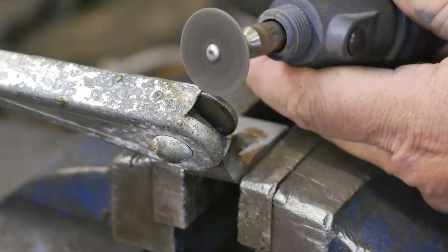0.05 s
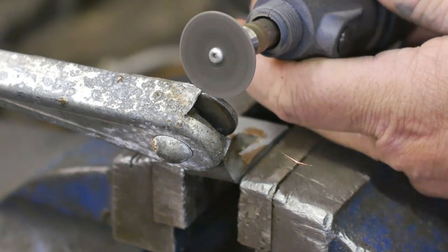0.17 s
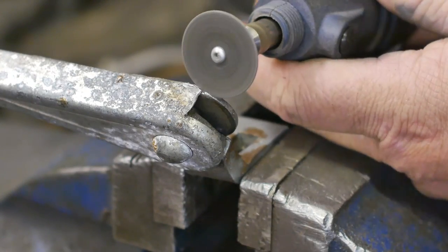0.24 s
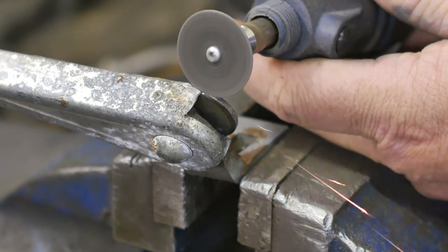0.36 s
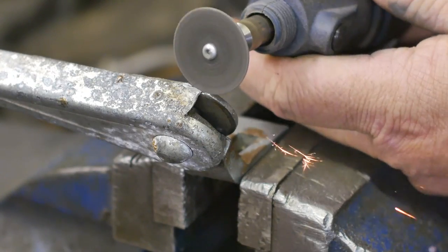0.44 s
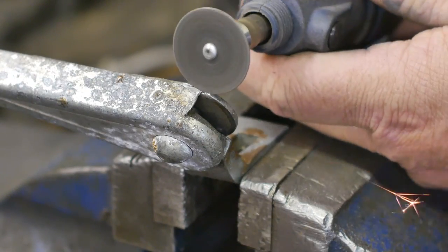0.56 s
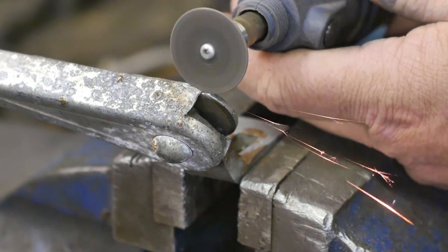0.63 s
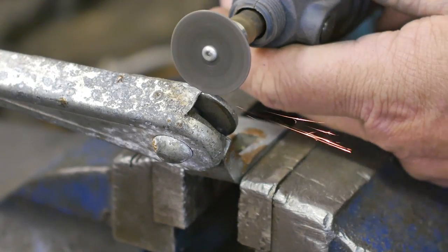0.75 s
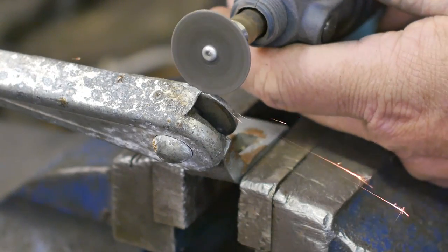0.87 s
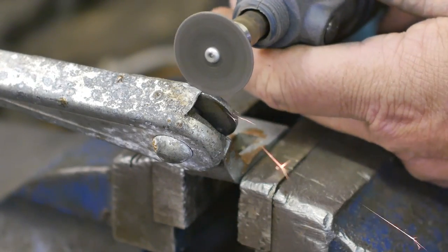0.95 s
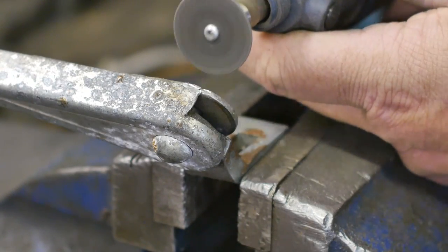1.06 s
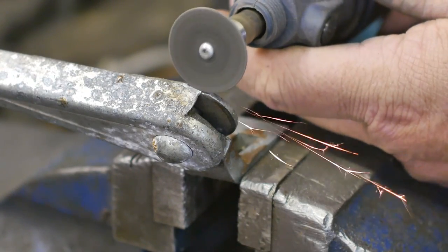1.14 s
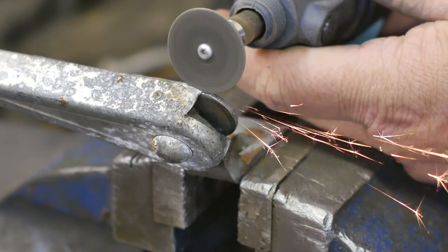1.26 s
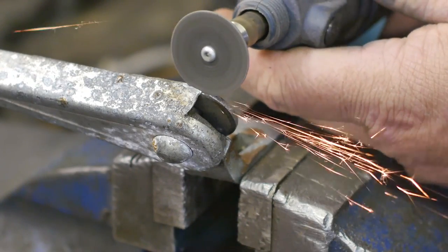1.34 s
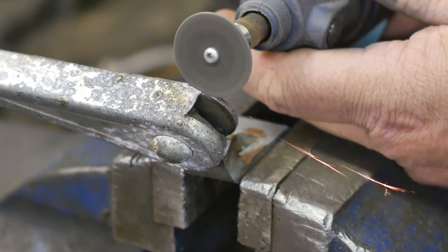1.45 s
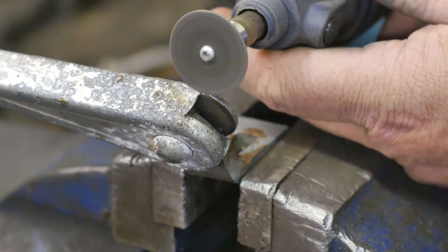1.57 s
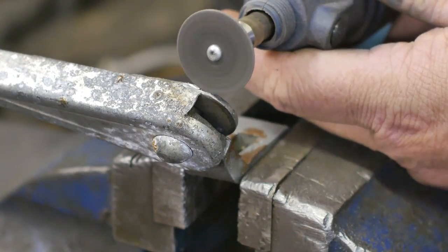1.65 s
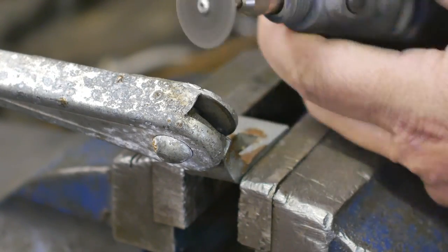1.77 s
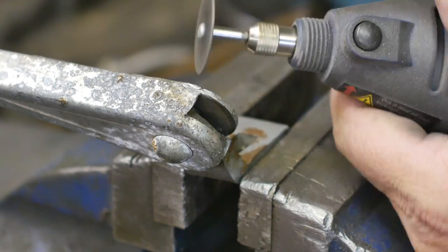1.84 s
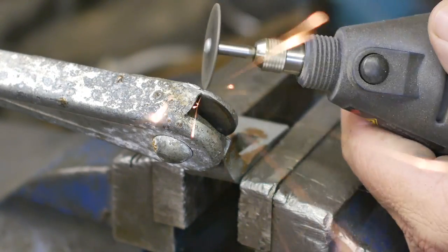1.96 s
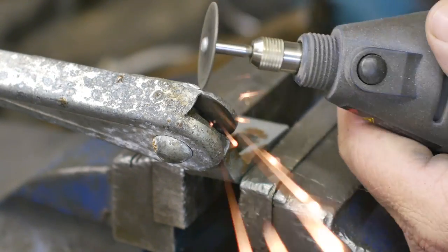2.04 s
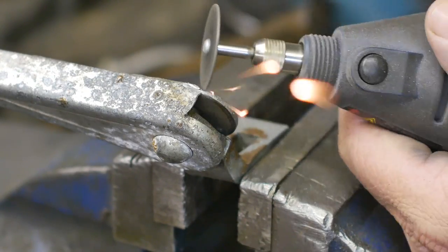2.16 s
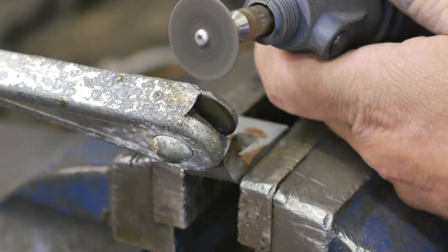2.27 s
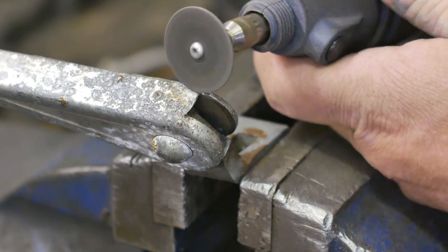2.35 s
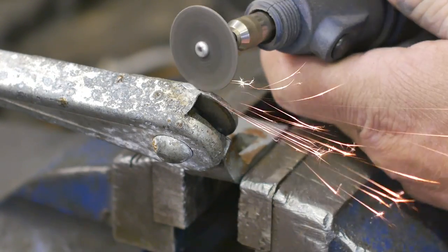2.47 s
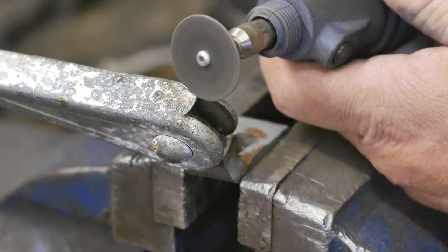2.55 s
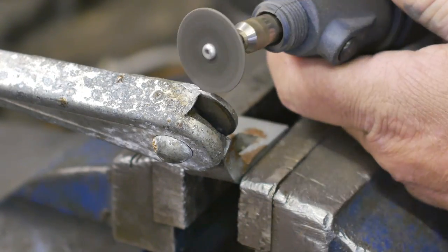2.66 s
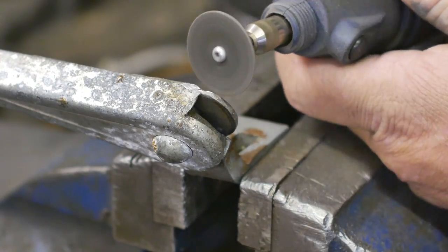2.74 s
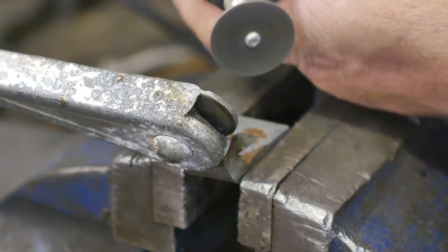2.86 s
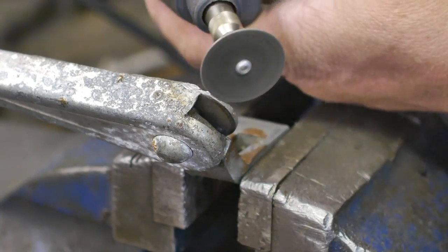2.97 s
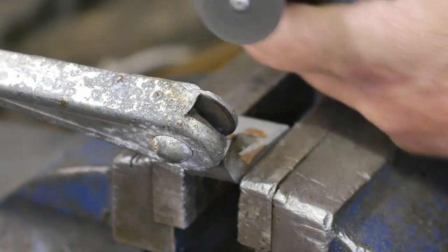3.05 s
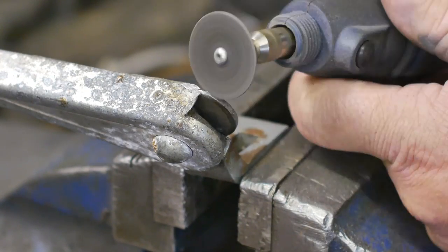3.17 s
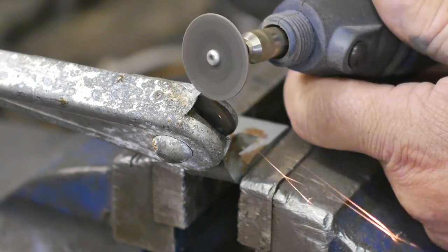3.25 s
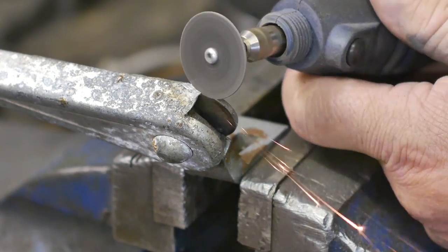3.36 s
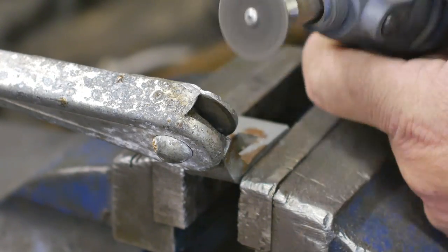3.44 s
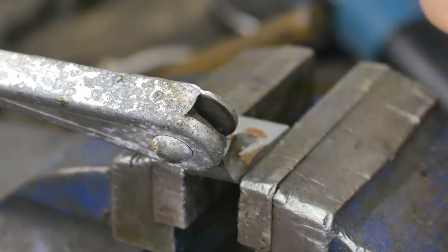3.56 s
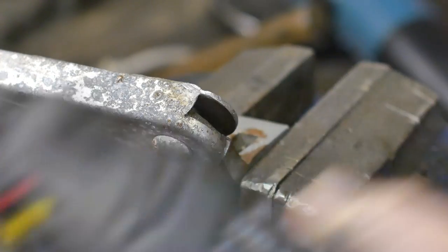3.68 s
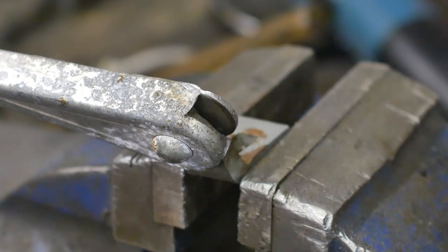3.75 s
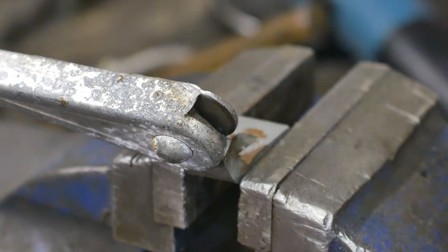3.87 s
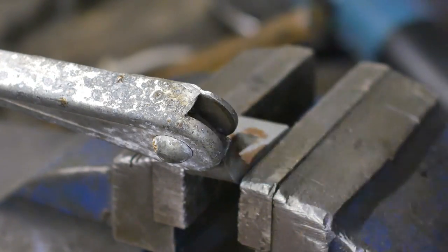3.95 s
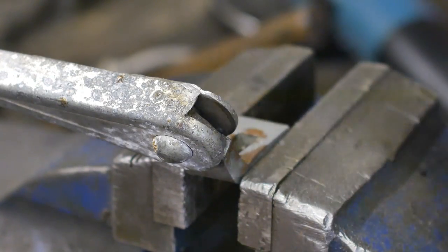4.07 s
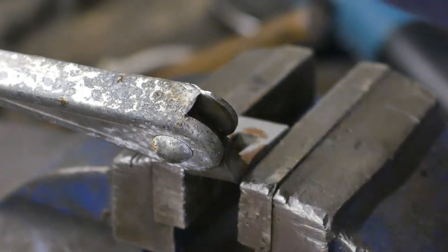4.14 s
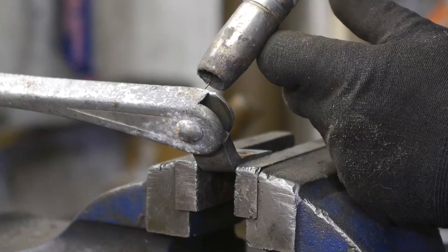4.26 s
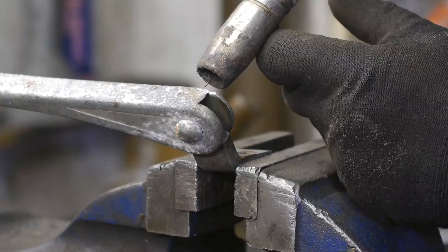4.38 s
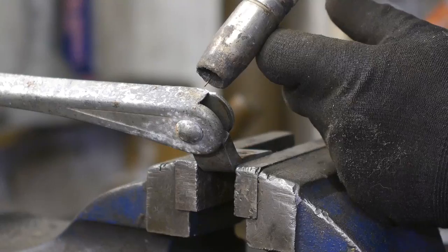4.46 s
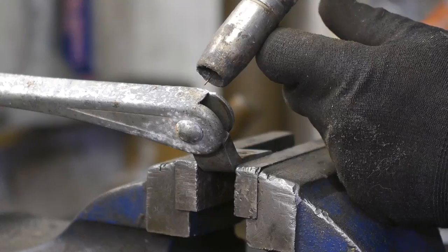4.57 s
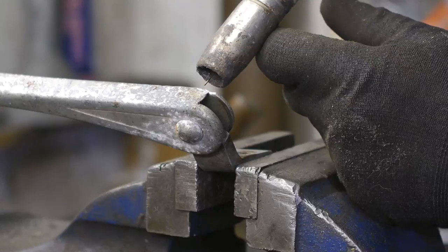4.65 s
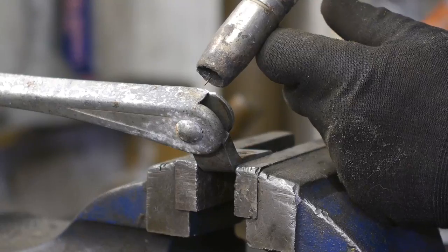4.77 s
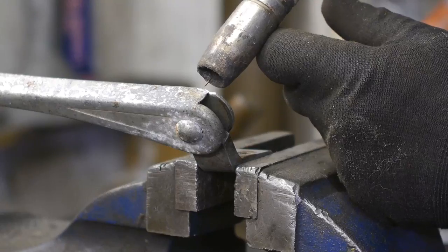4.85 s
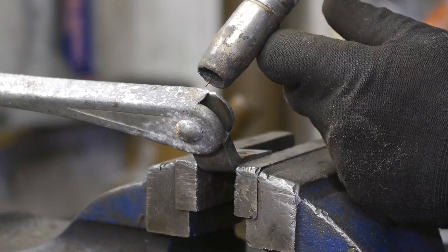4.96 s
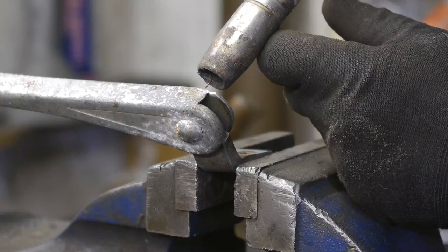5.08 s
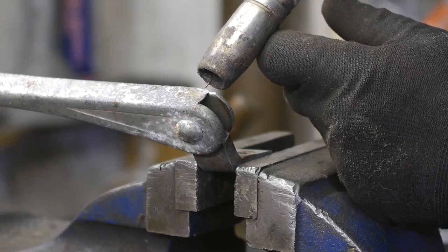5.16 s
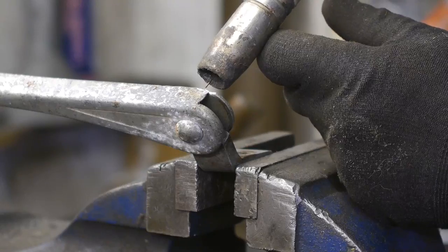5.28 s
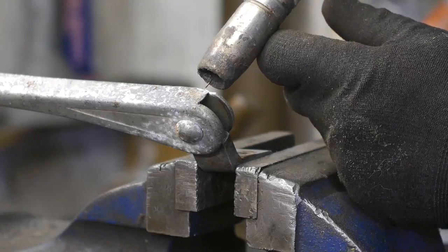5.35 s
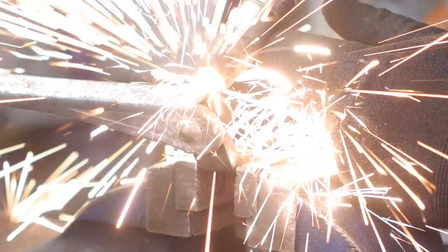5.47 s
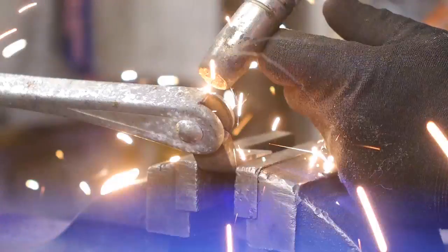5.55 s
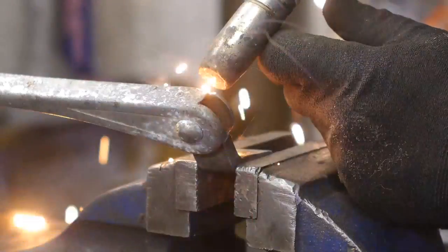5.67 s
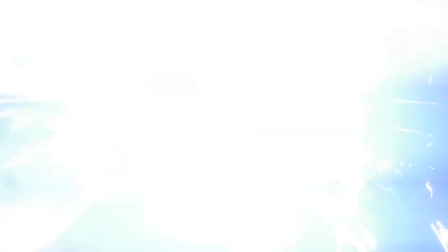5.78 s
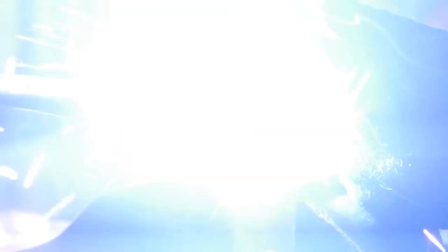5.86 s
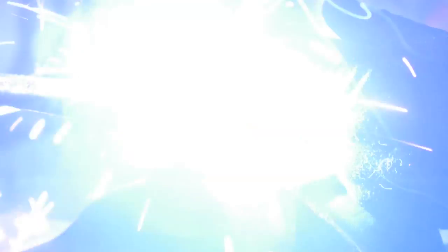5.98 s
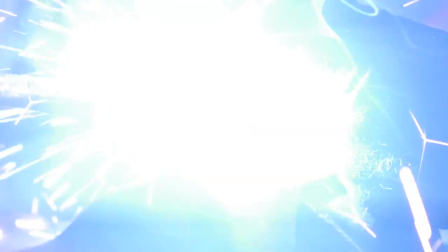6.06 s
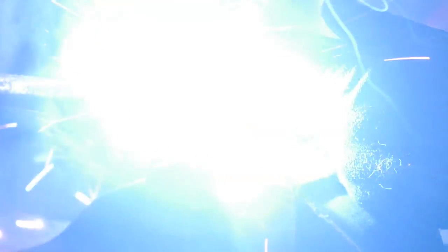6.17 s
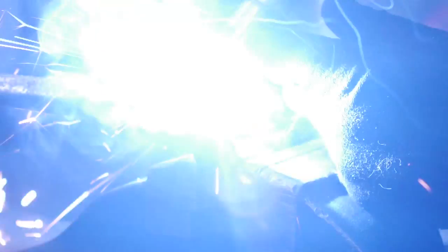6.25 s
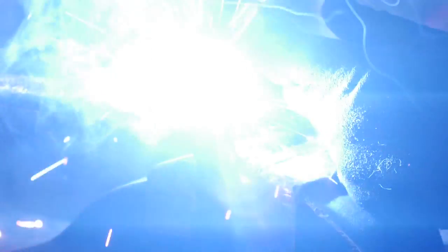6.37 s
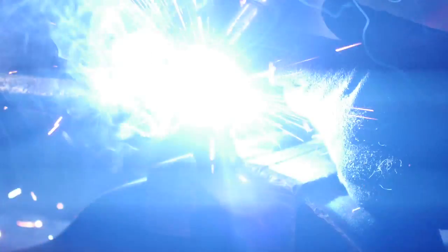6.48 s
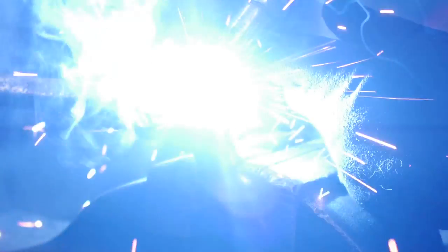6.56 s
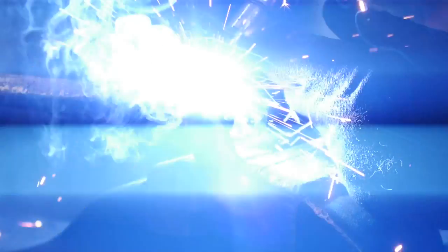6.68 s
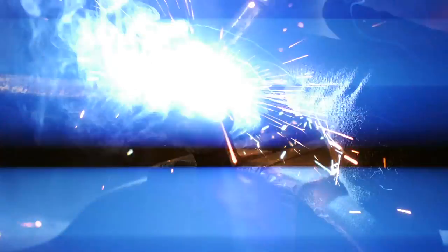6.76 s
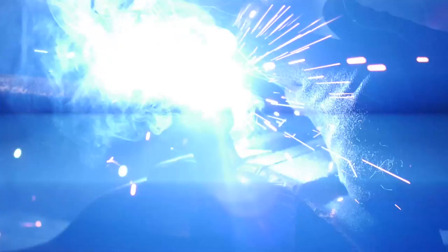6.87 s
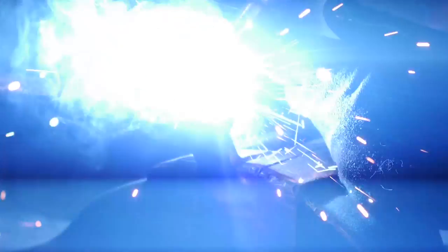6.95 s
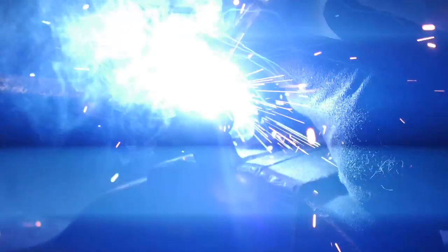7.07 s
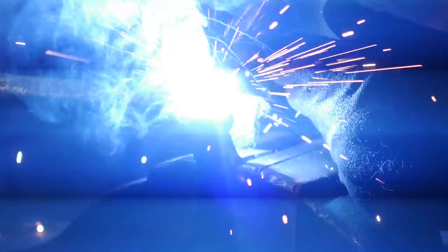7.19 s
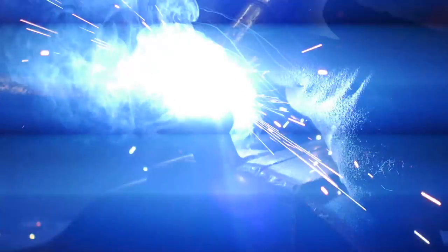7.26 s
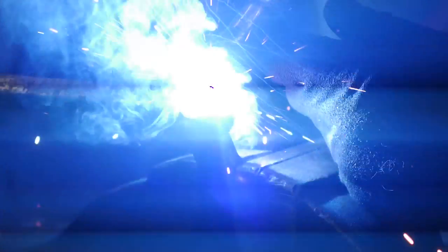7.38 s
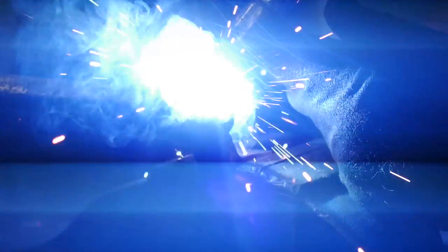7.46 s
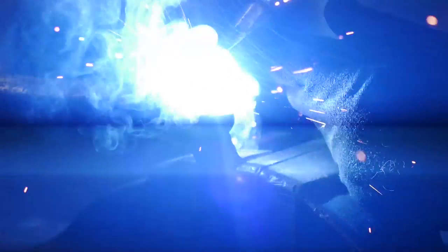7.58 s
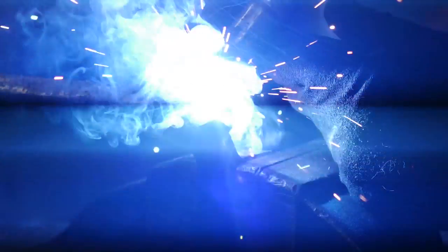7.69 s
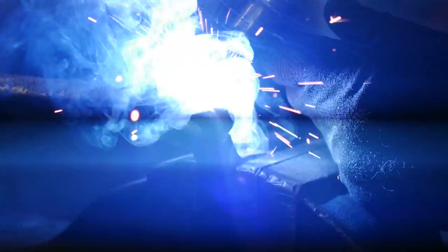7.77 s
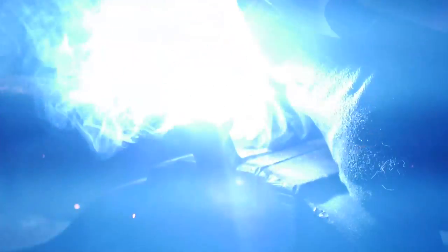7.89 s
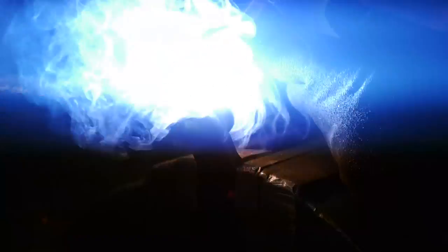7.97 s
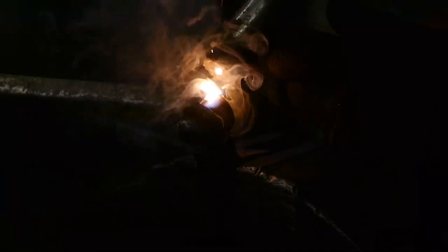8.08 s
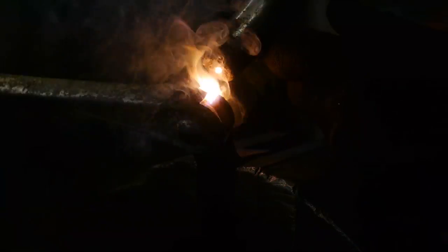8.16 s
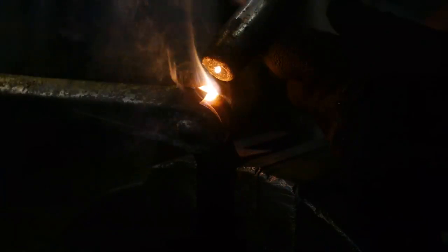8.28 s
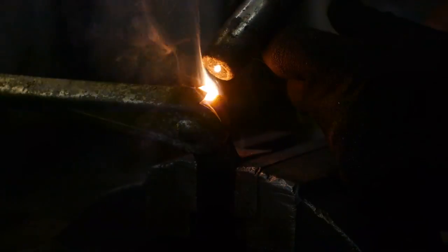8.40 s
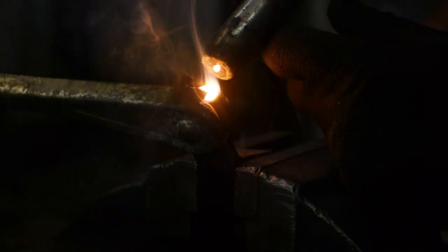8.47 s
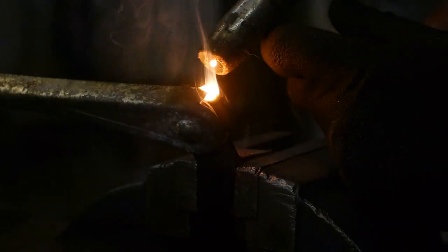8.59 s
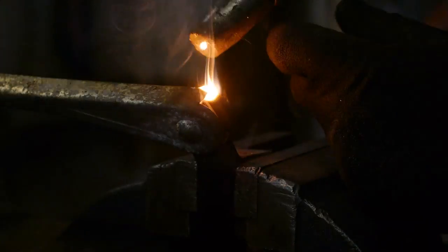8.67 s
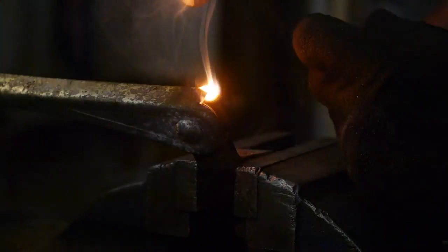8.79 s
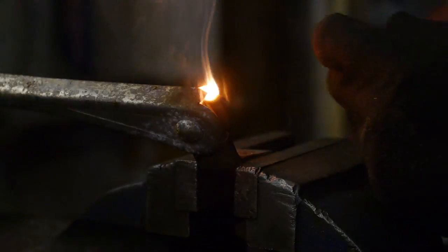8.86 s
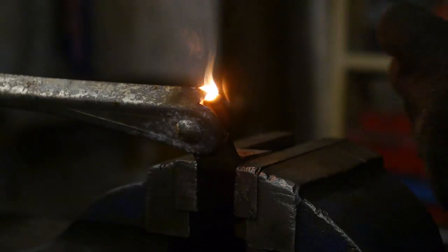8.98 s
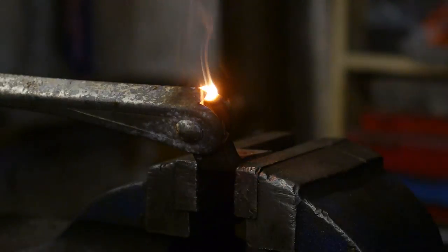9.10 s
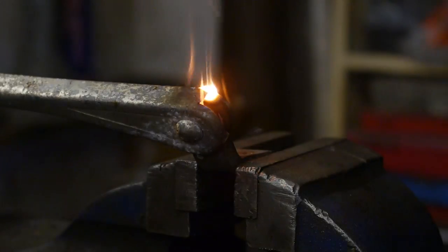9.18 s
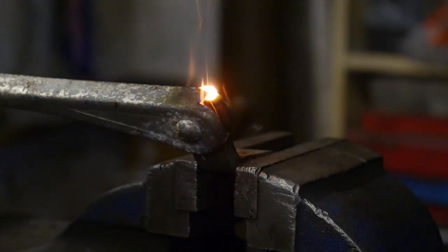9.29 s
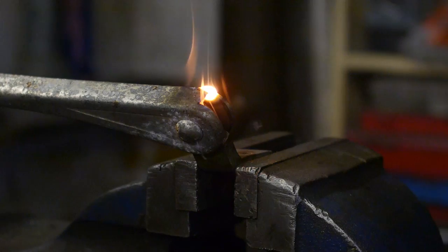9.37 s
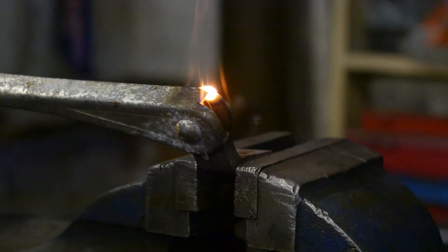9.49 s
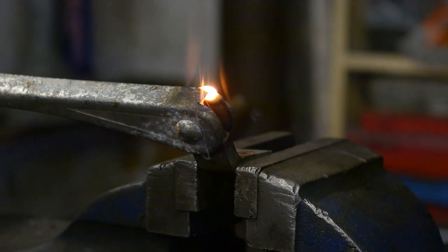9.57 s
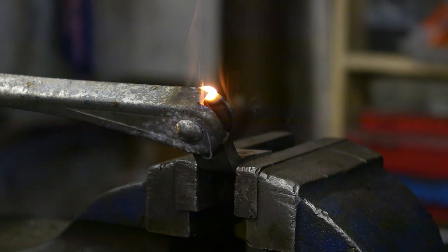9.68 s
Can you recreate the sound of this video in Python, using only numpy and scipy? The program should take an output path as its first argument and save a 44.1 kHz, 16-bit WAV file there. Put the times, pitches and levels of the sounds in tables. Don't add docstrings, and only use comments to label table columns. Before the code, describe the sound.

A small rotary cutter whines and rasps on steel in jittery bursts, coasts down, then a wire-feed welder clunks on, spits and crackles fiercely.

```python
import sys
import numpy as np
from scipy import signal
from scipy.fft import rfft, irfft, next_fast_len
from scipy.io import wavfile
from scipy.ndimage import uniform_filter1d

SR = 44100
rng = np.random.default_rng(int(sys.argv[2]) if len(sys.argv) > 2 else 0)


def digitize_waveform(pressure):
    field = np.atleast_2d(pressure).T
    bounded = np.clip(field, -1, 1)
    quanta = np.round(bounded * 32767).astype(np.int16)
    wavfile.write(sys.argv[1], SR, quanta)


def boost_factor(decibels):
    exponent = np.asarray(decibels, float) / 20
    return 10 ** exponent


N = 429093
T = np.arange(N) / SR
SPLICE_HZ = 90


def rms_one(x):
    return x / np.sqrt(np.mean(x ** 2) + 1e-20)


def in_time(rows):
    s, *columns = np.transpose(rows)
    return [np.interp(T, s, column) for column in columns]


def at_hz(points, hz):
    point_hz, value = np.array(points)[:, 0], np.array(points)[:, 1]
    return np.interp(np.log(hz), np.log(point_hz), value)


def drift(rate_hz, size=N):
    points = rng.standard_normal(int(size / SR * 400) + 2)
    return 1.4 * np.interp(np.arange(size) / SR * min(rate_hz, 399), np.arange(len(points)), points)


def butter(x, order, hz, kind="low"):
    return signal.sosfilt(signal.butter(order, hz, kind, fs=SR, output="sos"), x)


def sine(hz, t=T, phase=0):
    return np.sin(2 * np.pi * hz * t + phase)


def swell(events):
    return sum(height * np.exp(-((T - s) / half_s) ** 2) for s, half_s, height in events)


# frequency in Hz, side under mid in dB.
SIDE_UNDER_MID = [(60, -11.5), (200, -20.5), (400, -17.5), (1000, -18), (4000, -16), (14000, -12)]


def stereo_noise(spectrum, size=N, peaks=()):
    padded = next_fast_len(size)
    hz = np.fft.rfftfreq(padded, 1 / SR) + 1
    shape_db = at_hz(spectrum, hz)
    for centre_hz, width_hz, db in peaks:
        shape_db = shape_db + db / (1 + (2 * (hz - centre_hz) / width_hz) ** 2)
    mid, side = rfft(rng.standard_normal((2, padded))) * boost_factor(shape_db)
    side = side * boost_factor(at_hz(SIDE_UNDER_MID, hz))
    return rms_one(irfft([mid + side, mid - side], padded)[:, :size])


# frequency in Hz, t60 in s.
ROOM_DECAY = [(100, 0.39), (250, 0.5), (700, 0.33), (1500, 0.21), (4000, 0.25), (16000, 0.17)]


def dying_noise(spectrum, rise_s, peaks=(), early=0.):
    t = T[:SR]
    hz = np.fft.rfftfreq(SR, 1 / SR) + 1
    spec = rfft(stereo_noise(spectrum, SR, peaks))
    out = 0
    for octave in np.arange(5, 15):
        share = np.clip(1 - abs(np.log2(hz) - octave), 0, 1)
        t60_s = at_hz(ROOM_DECAY, 2. ** octave)
        out = out + irfft(spec * share, SR) * boost_factor(-60 * t / t60_s) / np.sqrt(t60_s)
    out = out * (1 - np.exp(-t / rise_s))
    out = out * (1 + early * np.exp(-t / 0.087))
    return out / np.sqrt(np.sum(out ** 2) / 2)


def play(clicks, answer):
    return signal.fftconvolve(np.atleast_2d(clicks), np.atleast_2d(answer), axes=1)[:, :N]


def ring(clicks, modes):
    out = 0
    for hz, db, t60_s in modes:
        radius, angle = boost_factor(-60 / (t60_s * SR)), 2 * np.pi * hz / SR
        struck = clicks * boost_factor(db) * (1 + 0.31 * drift(60)) + 1e-18
        feedback = [1, -2 * radius * np.cos(angle), radius * radius]
        out = out + signal.lfilter([0, np.sin(angle)], feedback, struck)
    return out


# time in s, turns per s.
COAST_DOWN = [(3.63, 415), (3.66, 344), (3.69, 280), (3.707, 225), (3.727, 170), (3.742, 135), (3.768, 88)]
# start in s, hold in s, easing off in s, bite in dB, shaft sag in turns per s.
PRESSES = [(0.088, 0.14, .03, -36.5, 75), (0.316, 0.0067, 0.011, -31.5, 3), (0.382, 0.014, 0.017, -38.5, 3),
           (0.425, 0.092, .03, -37.5, 45), (0.629, 0.29, 0.22, -36, 77), (1.198, 0.079, 0.029, -36.5, 8),
           (1.283, 0.12, .3, -34.5, 80), (1.733, 0.026, 0.014, -34, 3), (1.941, 0.28, .05, -41, 46),
           (2.19, .03, .03, -38, 3), (2.424, 0.21, 0.2, -40.5, 62), (2.679, 0.012, 0.044, -36.5, 3),
           (2.762, 0.0092, 0.061, -36, 3), (2.899, .02, 0.044, -43, 3), (2.969, 0.097, 0.062, -39, 35),
           (3.247, 0.12, 0.048, -35, 70), (3.374, 0.12, 0.041, -35, 48)]


def pressing():
    skim_db, press_s = -47.5, .012
    free_turns_per_s, tiring_per_s, inertia_s = 468, 4.5, .035
    bite_db, load = np.full(N, skim_db), np.zeros(N)
    for s, hold_s, ease_s, db, sag in PRESSES:
        corners_s = np.cumsum([s - press_s, press_s, hold_s, ease_s])
        pressure = np.interp(T, corners_s, [0, 1, 1, 0])
        bite_db = np.maximum(bite_db, skim_db + (db - skim_db) * pressure)
        load = np.maximum(load, sag * pressure)
    lag = np.exp(-1 / (inertia_s * SR))
    sag = signal.lfilter([1 - lag], [1, -lag], load)
    speed = free_turns_per_s - tiring_per_s * T + 4.5 * drift(16) - sag
    return bite_db, np.where(T < COAST_DOWN[0][0], speed, in_time(COAST_DOWN)[0])


# frequency in Hz, level in dB per Hz.
COOLING_AIR = [(88, -71), (150, -38.5), (341, -12.5), (439, -10.5), (578, -11), (821, -12), (1140, -9),
               (1360, -8.5), (1720, -10.5), (3770, -12), (5360, -22), (8560, -19.5), (16000, -54)]
# frequency in Hz, level in dB per Hz.
DISC_BITE = [(1760, -28), (3000, -9), (4600, -6), (5140, -1.5), (6860, -6), (7830, -0.5), (12600, -4.5),
             (15300, -6), (16000, -33)]
# centre in Hz, width in Hz, lift in dB.
DISC_MODES = [(5000, 250, 9.5), (5700, 160, -2.5), (7700, 430, 15), (10200, 500, 13.5), (12900, 1600, 9)]
# multiple of shaft speed, level over the air in dB.
SHAFT_ORDERS = [(4, -12), (5, -10.5), (6, -16.5), (7, -16.5)]
# multiple of shaft speed, running level in dB, coasting level in dB.
COMMUTATOR_ORDERS = [(8, -43, -51), (16, -54, -50), (24, -66, -57), (32, -66, -52)]
# time in s, half length in s, shaft tone, third order and air change in dB.
GRIP_SHIFTS = [(0.184, 0.042, -4, -6, -2.5), (0.434, 0.021, -2.5, -13.5, -4), (0.827, 0.088, -9.5, -2, 0),
               (1.373, 0.046, -21, -13, -1), (0.063, .015, -4, -2, 3), (1.158, 0.011, -1, -10, 2),
               (1.251, .03, -1.5, -5, -2), (1.791, 0.022, -2, -6, 0), (0.59, .04, 0, 1.5, 1.5),
               (2.82, .06, 1, -5, 0), (1.884, 0.04, 2, 4.5, -2.5), (1.98, 0.061, -6, 0.5, 1.5),
               (2.14, 0.15, 1, 3, 2), (2.397, 0.08, -1.5, -6, 1), (2.947, 0.062, -10.5, -3.5, 0.5),
               (3.154, 0.05, 0, 2, 0), (3.317, 0.025, -14, -9, 0), (3.447, 0.076, 0.5, -8, -2.5),
               (3.586, 0.021, 0, 10, 1.5)]
# time in s, change of tones, air and disc in dB.
POWER_OFF = [
    (3.52, 1.5, 3, -1),
    (3.62, 2.5, -1.5, -6),
    (3.66, -7, -8.5, -2),
    (3.7, -30, -14, 4),
    (3.76, -44, -19, -6),
    (3.8, -39, -39, -57),
]


def cutter():
    tone_base_db, air_base_db, speed_up = -36.5, -35, 8
    housing_hz, housing_width_hz, housing_db = 1408, 150, -32.5
    tones_off_db, air_off_db, disc_off_db = in_time(POWER_OFF)
    bite_db, speed = pressing()
    tone_grip_db, third_grip_db, air_grip_db = [
        swell([(row[0], row[1], row[column]) for row in GRIP_SHIFTS]) for column in (2, 3, 4)]
    tone_db = tone_base_db + tones_off_db + 0.37 * drift(23) + tone_grip_db
    detuning = 2 * (3 * speed - housing_hz) / housing_width_hz
    housing_lift_db = 10 * np.log10(0.069 + 1 / (1 + detuning ** 4))
    third_db = housing_db + tones_off_db + third_grip_db + 1.3 * drift(12) + housing_lift_db
    air_db = air_base_db + air_off_db + air_grip_db + 1.2 * drift(10)

    piece, fade = np.divmod(T * SPLICE_HZ, 1)
    piece = piece.astype(int)
    fade = np.clip(fade / .5, 0, 1)
    luck = rng.standard_normal((piece[-1] + 2, 4))
    starts = np.minimum(np.arange(len(luck)) * SR // SPLICE_HZ, N - 1)
    turn = 2 * np.pi * np.cumsum(speed[starts][piece]) / SR
    skipped = (speed_up - 1) * turn[starts] + .3 * np.cumsum(luck[:, 0]) + 0.56 * luck[:, 3]
    old, new = turn + skipped[np.maximum(piece - 1, 0)], turn + skipped[piece]

    third_luck_db = 2.7 * uniform_filter1d(luck[piece // 2, 0], size=150)
    levels = [(1, tone_db + 3.5),
              (2, tone_db - 13.0 + 3.9 * drift(9)),
              (3, third_db + 0.5 + third_luck_db)]
    for order, db in SHAFT_ORDERS:
        levels.append((order, air_db + db + 3 * drift(9)))
    coasting = T > COAST_DOWN[1][0] - .01
    for order, running_db, coast_db in COMMUTATOR_ORDERS:
        treble_loss_db = 22 * np.clip(np.log2(order * speed / 4700), 0, 2)
        db = np.where(coasting, coast_db - treble_loss_db, running_db)
        levels.append((order, db + 1.8 * drift(30)))
    tones = 0
    for order, db in levels:
        flutter = 1 + 0.094 * min(order - 1, 5) * drift(150)
        spliced = fade * np.sin(order * new) + (1 - fade) * np.sin(order * old)
        tones = tones + boost_factor(db) * flutter * spliced
    turning = np.clip((COAST_DOWN[-1][0] - T) / .03, 0, 1)
    tones = tones * turning * (1 + 0.044 * drift(300) * [[1], [-1]])

    air = boost_factor(air_db - 1.0 + 1.2 * drift(45)) * stereo_noise(COOLING_AIR, peaks=[(3770, 500, 4.6)])
    bite_luck, ring_luck = uniform_filter1d(luck[piece // 2, 1:3].T, size=90)
    bite_db = bite_db + disc_off_db + 0.67 * np.cos(new)
    bite = boost_factor(bite_db + 0.1 + 2.4 * bite_luck) * stereo_noise(DISC_BITE)
    disc_ring = boost_factor(bite_db - 9.5 + 6.4 * ring_luck) * stereo_noise(DISC_BITE, peaks=DISC_MODES)
    disc = bite + disc_ring
    slowing = np.clip((T - COAST_DOWN[0][0]) / .06, 0, 1)
    disc = disc - 0.95 * slowing * butter(disc, 1, 6000, "high")
    return tones + (air + disc) * (T < POWER_OFF[-1][0])


# start in s, end in s, frequency in Hz, level in dB, steady share from 0 to 1.
RIM_SONGS = [(.1, .23, 5000, -40, 0.4), (.43, .48, 7800, -40, 0.3), (1.18, 1.3, 8900, -45, 0.4),
             (1.675, 1.725, 5400, -36.5, 0.2), (1.96, 2.06, 6600, -41, 0.4), (1.98, 2.08, 7950, -42, .5),
             (2.12, 2.28, 6460, -41, 0.5), (2.19, 2.24, 7800, -43, .3), (2.415, 2.2, 5000, -38, 0.9),
             (2.525, 2.73, 5000, -35, 0.15), (2.96, 3.06, 6230, -39, .2), (2.97, 3.02, 9930, -33.5, 0),
             (3.04, 3.07, 11000, -32, .1), (3.37, 3.49, 6500, -46, 0.98), (3.38, 3.48, 7950, -47, .5),
             (3.25, 3.6, 7900, -44.5, .2), (3.04, 3.09, 5400, -44, .2), (2.6, 2.73, 5450, -40, 0),
             (1.95, 1.9, 5000, -45.5, 0.5), (.19, .23, 4700, -38, .3), (0.65, .9, 4400, -47, .5),
             (.47, 0.59, 4900, -41, .6), (0.7, .92, 3000, -43.5, .6), (2.13, 2.2, 6280, -46, .4),
             (2.6, 2.6, 3900, -39, .8), (1.33, 1.44, 3000, -39, .6)]


def squeals():
    out = np.zeros(N)
    blips = np.clip(np.sin(np.pi * SPLICE_HZ * T + .5), 0, 1)
    for start, stop, hz, db, steady in RIM_SONGS:
        span = slice(int(start * SR), int(stop * SR))
        t = T[span]
        waver, wander = drift(250, size=SR)[:len(t)], drift(90, size=SR)[:len(t)]
        edges = np.interp(t, [start, start + .008, stop - .008, stop], [0, 1, 1, 0])
        level = edges * boost_factor(db) * (steady + (1 - steady) * blips[span]) * (1 + 0.47 * waver)
        out[span] += level * sine(hz, t, 1.6 * wander)
    return out


# time in s, dip in dB, spatter in dB, blow to the room in dB.
COLD_STRIKES = [
    (5.4845, -4, -12, -3.5),
    (5.5357, -2.5, -12, -2),
    (5.6498, -32, -26.5, -17),
    (5.6523, -20, -17.5, -9),
    (5.7005, -14, -11, -2),
    (5.8141, -3.5, -12.5, -5),
    (7.9514, -8.5, -19, -11),
]


def strikes():
    cracks, blows = np.zeros((2, N))
    t = T[:400]
    for s, peak_db, spatter_db, blow_db in COLD_STRIKES:
        at = int(s * SR)
        spatter = rng.standard_normal(400) * np.exp(-t / 0.0017) * np.clip(t / 0.0014, 0, 1)
        cracks[at:][:400] += boost_factor(spatter_db) * spatter
        cracks[at] += boost_factor(peak_db)
        blows[at] = boost_factor(blow_db)
    return cracks, blows


# time in s, peak in dB.
RESTRIKES = [(5.8224, -4), (5.8398, -4), (5.8641, -5), (5.9106, -8), (5.937, -7), (5.9506, -5),
             (6.0813, -6), (6.1124, -3), (6.1318, -6), (6.1449, -7), (6.153, -6), (6.1744, -4),
             (6.2321, -7), (6.2701, -9), (6.3026, -4), (6.3145, -5), (6.3276, -8), (6.348, -9),
             (6.3865, -6), (6.3966, -8), (6.4527, -8), (6.5208, -7), (6.5847, -9), (6.6337, -6),
             (6.6524, -6), (6.6719, -8), (6.704, -5), (6.711, -6), (6.7297, -8), (6.7854, -10),
             (6.8607, -8), (6.8909, -9), (6.9315, -10), (6.9618, -7), (6.9835, -5), (6.9968, -8),
             (7.0408, -8), (7.2434, -8), (7.2676, -8), (7.2927, -11), (7.3001, -10), (7.3289, -11),
             (7.3536, -9), (7.3626, -8), (7.4199, -9), (7.4516, -8), (7.5023, -11), (7.5525, -10),
             (7.5612, -11), (7.5707, -11), (7.6085, -13), (7.617, -11), (7.634, -10), (7.7337, -9),
             (7.7504, -10), (7.85, -11), (7.9267, -10), (7.9365, -10)]
# time in s, short circuits per s, usual peak in dB.
SHORT_CIRCUITS = [(5.81, 113, -7.5), (6.38, 107.6, -10), (6.42, 136, -9.5), (6.62, 160, -13),
                  (6.66, 115, -11), (7.95, 121, -14)]
# start in s, end in s, change in dB.
FALTERS = [
    (6.085, 6.111, -9),
    (6.272, 6.301, -5),
    (7.938, 7.95, -12),
]


def short_circuits():
    strong = np.array(RESTRIKES)
    per_s, usual_db = in_time(SHORT_CIRCUITS)
    usual_db = usual_db + sum(db * (T > start) * (T < stop) for start, stop, db in FALTERS)
    first_s, last_s = SHORT_CIRCUITS[0][0] + .01, SHORT_CIRCUITS[-1][0] - .005
    strong = strong[(strong[:, 0] > first_s) & (strong[:, 0] < last_s)]
    clicks = np.zeros(N)
    clicks[(strong[:, 0] * SR).astype(int)] = boost_factor(strong[:, 1] - 1.5)
    marks = np.r_[COLD_STRIKES[-2][0], strong[:, 0], COLD_STRIKES[-1][0]]
    for start, stop in zip(marks, marks[1:]):
        luck = rng.standard_normal((60, 2))
        count = max(round((stop - start) * per_s[int(start * SR)]), 1)
        place = (np.arange(1, count) + .2 * luck[:count - 1, 0]) / count
        at = ((start + place * (stop - start)) * SR).astype(int)
        clicks[at] = boost_factor(usual_db[at] - 2.5 + 2.4 * luck[:count - 1, 1])
    return clicks


# centre in Hz, width in Hz, share removed.
PATH_NULLS = [(440, 120, .6), (770, 50, .6), (1500, 60, .7), (2250, 300, .3), (4680, 80, .6),
              (5870, 420, .6), (10100, 500, .6), (13600, 900, .6)]


def cancel(x):
    for hz, width_hz, share in PATH_NULLS:
        x = x - share * signal.lfilter(*signal.iirpeak(hz, hz / width_hz, fs=SR), x)
    return x


# delay in ms, gain.
CLOSE_ECHOES = [(.09, -.3), (.17, .13), (.25, -.2), (.3, .27), (.39, .39), (.44, .1), (.49, .32),
                (.56, -.1), (.7, .15), (1.04, .14), (1.25, .13)]
# frequency in Hz, level in dB per Hz.
ARC_COLOUR = [(40, -20), (88, -44), (150, -16.5), (217, -5.5), (328, -1.5), (448, -18), (662, -4.5),
              (979, -7.5), (1290, -4.5), (2220, -8), (4160, -2.5), (5910, -5.5), (9080, -2), (14800, -7),
              (16000, -37.5)]
# centre in Hz, width in Hz, lift in dB.
BENCH_MODES = [(173, 22, 7), (212, 28, 16), (340, 60, 9.5), (1460, 570, 6.5), (1787, 320, 4.5),
               (4170, 730, 2.5), (5350, 130, 5.5), (184, 9, -6.5), (425, 57, -6), (1490, 79, -13)]
# centre in Hz, width in Hz, change in dB.
ROOM_NOTCHES = [(2170, 74, -3.5), (5500, 1300, -3.5), (9820, 540, -9), (13700, 6000, -4)]
# time in s, half length in s, extra share.
POOL_SURGES = [
    (6.005, .045, 1.1),
    (6.12, .02, .5),
    (6.305, 0.016, 0.6),
]
PART_MODES_HZ = [171, 217, 312, 689, 800, 1077, 1279, 1570, 1757, 3752, 4127, 5286, 8523, 9147]
# level in dB, t60 in s.
PART_RING = [(-49.5, 0.15), (-38.5, 0.28), (-39.5, 0.18), (-36.5, 0.17), (-38, 0.2), (-36, 0.14),
             (-31.5, 0.11), (-41, 0.1), (-33, 0.12), (-36, 0.092), (-34.5, 0.1), (-37.5, 0.11), (-41, 0.12),
             (-37.5, .08)]
# frequency in Hz, level in dB, t60 in s.
STRIKE_RING = [(820, -23, 0.035), (1783, -22, 0.044), (3250, -23.5, 0.013), (4070, -15, 0.05),
               (5020, -29.5, 0.092), (8300, -23, 0.052)]
# frequency in Hz, level in dB, t60 in s.
BENCH_JOLT = [(42, -52, .25)]


def arc():
    clicks = short_circuits()
    near = np.zeros(64)
    near[0] = 1
    for delay_ms, gain in CLOSE_ECHOES:
        near[round(delay_ms * SR / 1000)] -= gain
    near = np.convolve(near, [.54, 1, .56])

    answers = [dying_noise(ARC_COLOUR, 0.003, BENCH_MODES + ROOM_NOTCHES, early=0.31) for _ in range(4)]
    wander = np.array([drift(6.7) for _ in answers])
    shares = 1 + 0.32 * wander + .35 * rng.standard_normal((4, N))
    shares = shares * [[1.6], [1], [1], [1]]
    shares = shares / np.linalg.norm(shares, axis=0)
    room = sum(play(clicks * share, answer) for share, answer in zip(shares, answers))
    room = room + swell(POOL_SURGES) * butter(room, 2, 2000)

    cold, blows = strikes()
    dull = [(hz, db - max(np.log2(hz / 4000), 0)) for hz, db in ARC_COLOUR]
    wide = dying_noise(dull, 0.0024, ROOM_NOTCHES[1:], early=0.53) + 0.49 * answers[0]
    room = cancel(room) + boost_factor(0.5) * play(blows, wide)

    part = ring(clicks, [(hz, *row) for hz, row in zip(PART_MODES_HZ, PART_RING)])
    heard = -play(clicks + cold, near) + boost_factor(6.5) * room - part - ring(blows, STRIKE_RING)
    return butter(heard, 2, 105, "high") + ring(blows, BENCH_JOLT)


# time in s, rms in dB, treble change in dB.
SWITCHING = [
    (5.316, -32, 10.5),
    (8.14, -33, -8.5),
]
# frequency in Hz, level in dB per Hz.
CLUNK_COLOUR = [(35, -44.5), (60, -22), (202, -14), (822, -10.5), (1740, -6), (2190, -12.5), (4320, -12.5),
                (6000, -14), (8320, -16.5), (11300, -19.5), (16000, -61.5)]
# frequency in Hz, level in dB, t60 in s.
CASE_MODES = [(62, -41, 0.5), (168, -22, 1.3), (190, -29, .9), (214, -18, 0.7), (298.6, -31.5, 0.93),
              (573, -39.5, 0.66), (810, -33, 0.52), (1324, -35, .9), (2051, -40.5, 0.46), (2530, -37, 0.91),
              (2910, -36, .7), (4300, -40, .5)]
# frequency in Hz, level in dB per Hz.
FEED_COLOUR = [(59, -46.5), (100, -18.5), (219, -7.5), (558, -22.5), (621, -26.5), (1830, -24.5),
               (2170, -38), (8640, -39.5), (16000, -46.5)]
# time in s, level in dB.
FEED_COURSE = [
    (5.33, -54),
    (5.36, -31.5),
    (5.48, -43),
    (5.8, -51),
    (8, -62),
    (8.1, -50),
    (8.16, -54),
    (8.2, -84.5),
]
# frequency in Hz, level over the feed in dB.
FEED_LINES = [(310, -3), (1350, -14), (1900, -17)]
# start in s, end in s, frequency in Hz, level in dB.
VALVE_WHISTLE = (8.115, 8.14, 3450, -66)


def welder():
    out, since = np.zeros((2, N)), T[:SR]
    for s, level_db, treble_db in SWITCHING:
        colour = [(hz, db + treble_db * np.clip(np.log2(hz / 4000), 0, 1)) for hz, db in CLUNK_COLOUR]
        out[:, int(s * SR):][:, :SR] += boost_factor(level_db + 34.0) * dying_noise(colour, 0.0047)
        for hz, db, t60_s in CASE_MODES:
            panel = boost_factor(-60 * since / (0.2 * t60_s))
            after = 0.053 * min(350 / hz, 1) * boost_factor(-60 * since / t60_s + 3.6 * drift(25, size=SR))
            mode = boost_factor(db) * (panel + after) * (1 - np.exp(-since / 0.014)) * sine(hz, since)
            out[:, int((s + .006) * SR):][:, :SR] += mode
    start, stop, hz, db = VALVE_WHISTLE
    out += (T > start) * (T < stop) * boost_factor(db + 3.9 * drift(93)) * sine(hz)
    hum = sum(boost_factor(db + 1.914 * drift(43)) * sine(hz, phase=1.5 * drift(11)) for hz, db in FEED_LINES)
    level = boost_factor(in_time(FEED_COURSE)[0] + 2.2 * drift(30))
    running = (T > FEED_COURSE[0][0]) * (T < FEED_COURSE[-1][0])
    return out + running * level * (stereo_noise(FEED_COLOUR) + hum)


# time in s, peak in dB, centre in Hz, burst in s.
KNOCKS = [(3.802, -43, 1240, 0.0046), (3.822, -33, 429, 0.0051), (3.832, -21, 440, 0.0013),
          (3.8326, -20, 1400, 0.0013), (3.837, -32.5, 78.1, 0.0048), (3.884, -48, 61, 0.0036),
          (3.924, -56, 138, 0.0032), (3.845, -52, 4000, .008), (3.922, -54, 4000, .006),
          (3.949, -54, 3000, 0.0046), (4.12, -56.5, 2500, 0.0091), (4.163, -60, 7000, .002),
          (4.2, -54, 7000, .006), (3.967, -39, 11000, .004), (3.953, -51, 94.2, 0.004),
          (3.966, -27.5, 5500, 0.0055), (3.972, -30.5, 3340, 0.0033), (4.027, -43.5, 357, 0.0031),
          (4.056, -42, 1370, 0.003), (4.063, -40.5, 387, 0.0055), (4.073, -34, 1570, 0.0039),
          (4.122, -53, 122, 0.0033), (4.204, -51, 4480, 0.0097), (4.214, -67.5, 64, 0.0051),
          (4.314, -67.5, 61.9, 0.0055), (9.389, -58, 953, 0.0043), (9.495, -50, 62, 0.0077),
          (9.498, -49, 190, 0.0086), (9.679, -58, 116, 0.004)]
# time in s, level in dB, frequency in Hz, t60 in s.
STEEL_DING = (4.316, -66, 1110, .25)


def handling():
    out = np.zeros(N)
    for s, db, hz, burst_s in KNOCKS:
        width_s = max(burst_s, .0008)
        burst = rng.standard_normal(2000) * np.exp(-(T[:2000] / width_s - 1.2) ** 2)
        rung = butter(burst, 2, [hz * 0.45, min(hz * 1.6, 18000)], "band")
        skirt = butter(burst, 2, min(hz * 3.5, 18000))
        knock = rung / abs(rung).max() + 0.44 * skirt / abs(skirt).max()
        start = int(s * SR) - 40
        out[start:][:2000] += boost_factor(db - 7.5) * knock[:N - start]
    out = butter(out, 2, 13000)
    s, db, hz, t60_s = STEEL_DING
    out += (T > s) * boost_factor(db - 60 * np.clip(T - s, 0, None) / t60_s) * sine(hz)
    return out


# frequency in Hz, level in dB per Hz.
RUMBLE = [(12, -40), (20, -18.5), (58, -6), (113, -13), (172, -14), (270, -20.5), (301, -9.5), (328, -24.5),
          (399, -12), (434, -23.5), (607, -21), (802, -24.5), (16000, -50)]
# time in s, level in dB.
RUMBLE_LEVEL = [(0, -73), (3.8, -72.5), (4.2, -83.5), (4.26, -71.5), (4.8, -72), (5.25, -70.5),
                (8.3, -70.5), (8.8, -72.5), (9, -67), (9.73, -64.5)]
# frequency in Hz, level in dB, start in s, end in s.
FAR_HUMS = [
    (298, -85, 4.25, 24),
    (447, -76, 8.7, 10),
    (57.1, -69.5, 4.22, 4.73),
    (106, -77.5, 4.5, 3.6),
]
# time in s, level in dB.
RUSTLES = [
    [(3.78, -77), (3.814, -70), (3.984, -72.5), (4.138, -74), (4.3, -86.5)],
    [(8.97, -73), (9.034, -68), (9.166, -63.5), (9.348, -60), (9.73, -70.5)],
]
# frequency in Hz, level in dB per Hz.
CLOTH_COLOUR = [(88, -46), (150, 2), (466, 3), (578, 2), (649, 6.5), (1450, 4.5), (1830, 2), (8070, -11),
                (16000, -22)]


def shop():
    floor = boost_factor(in_time(RUMBLE_LEVEL)[0] + 1.1 * drift(7.0)) * stereo_noise(RUMBLE)
    for hz, db, start, stop in FAR_HUMS:
        on = uniform_filter1d(1. * (T > start) * (T < stop), size=4000)
        floor += on * boost_factor(db + 2.3 * drift(15.0)) * sine(hz, phase=2.8 * drift(21))
    rub = 0
    for rows in RUSTLES:
        rub = rub + boost_factor(in_time(rows)[0] - 0.5) * (T > rows[0][0]) * (T < rows[-1][0])
    return floor + rub * boost_factor(0.79 * drift(40)) * stereo_noise(CLOTH_COLOUR)


def scene():
    return cutter() + squeals() + arc() + welder() + handling() + shop()


def band_limit(x):
    return signal.sosfilt(signal.butter(12, 16660, fs=SR, output="sos"), x)


def record(dry):
    hiss_db, clip_level, top_hz = -79, 1.3, 16350
    mid, side = (dry[0] + dry[1]) / 2, (dry[0] - dry[1]) / 2
    side = side * np.clip(1.7 * (drift(45) + .5 * drift(8) - .2), .03, 1.3)
    both = mid + side * [[1], [-1]] + boost_factor(hiss_db) * rng.standard_normal(dry.shape)
    both = clip_level * np.tanh(both / clip_level)
    both = signal.sosfilt(signal.cheby2(12, 55, top_hz, fs=SR, output="sos"), both)
    return band_limit(both)


dry = scene()
out = record(dry)
digitize_waveform(out)
```